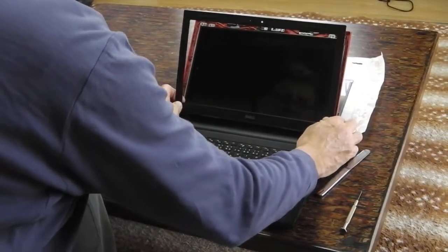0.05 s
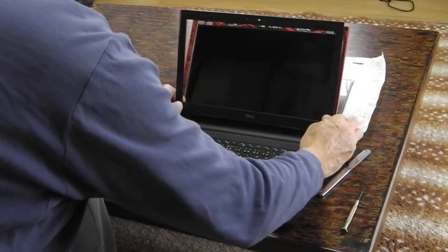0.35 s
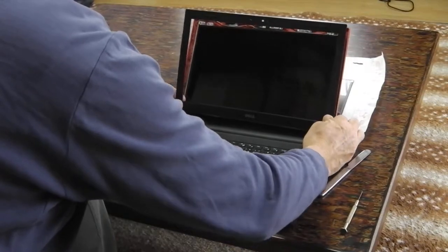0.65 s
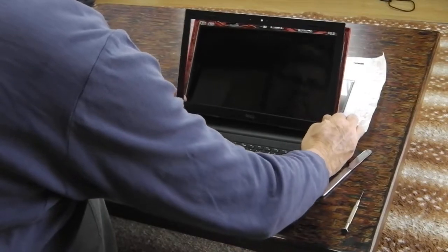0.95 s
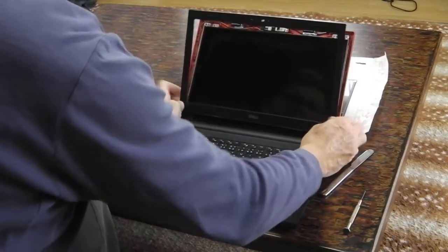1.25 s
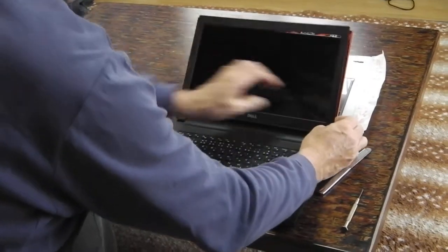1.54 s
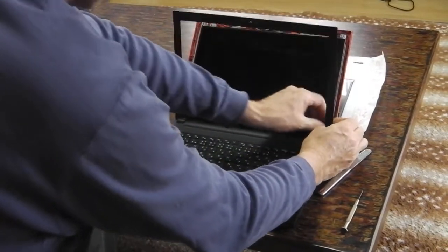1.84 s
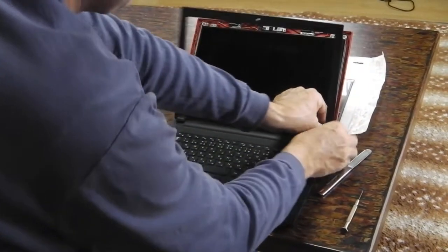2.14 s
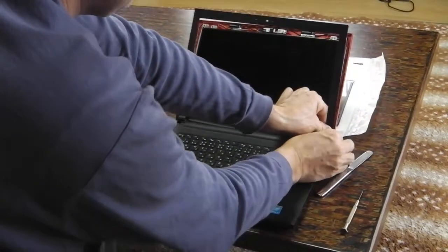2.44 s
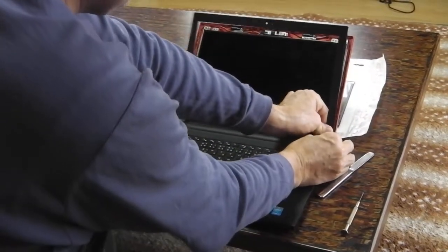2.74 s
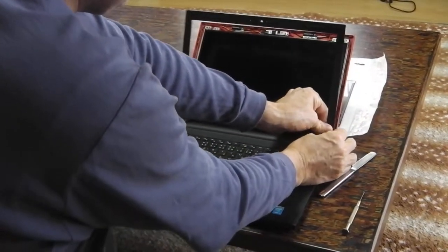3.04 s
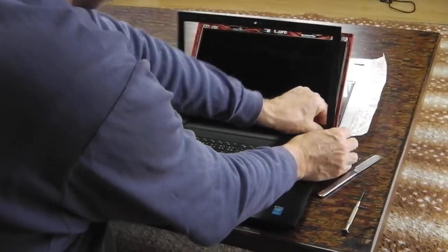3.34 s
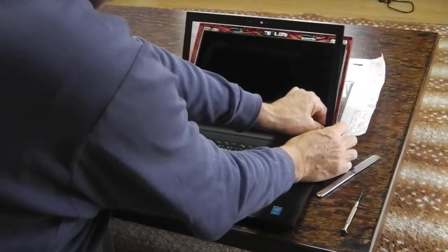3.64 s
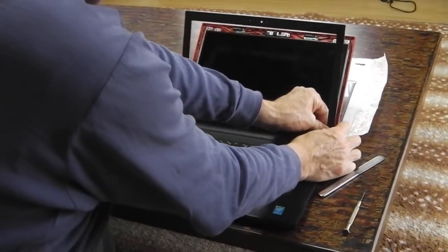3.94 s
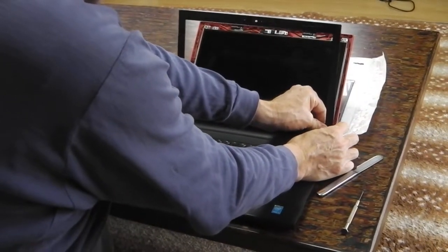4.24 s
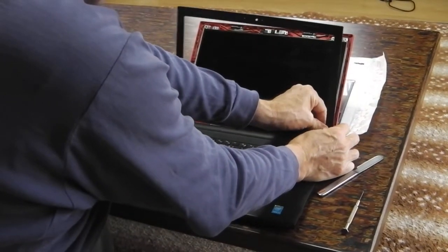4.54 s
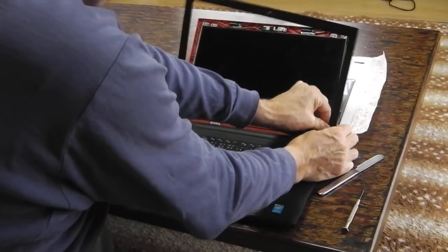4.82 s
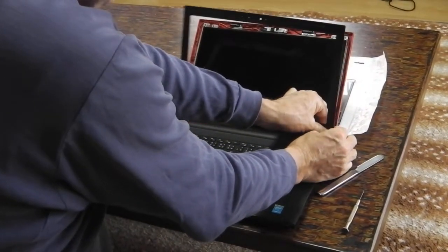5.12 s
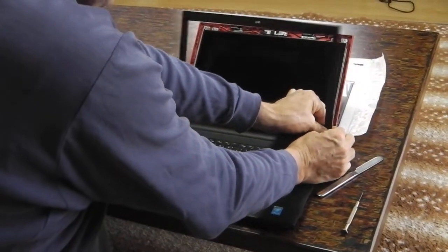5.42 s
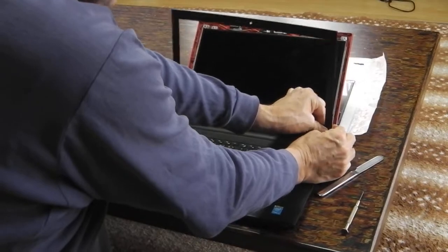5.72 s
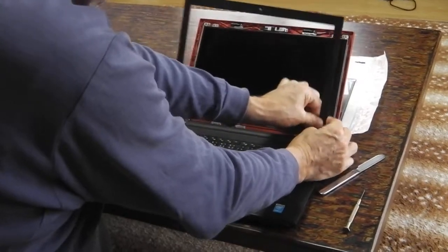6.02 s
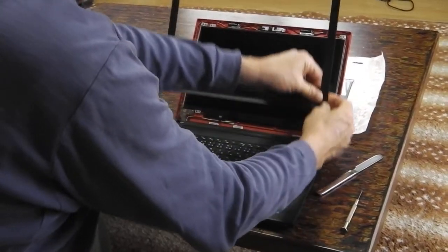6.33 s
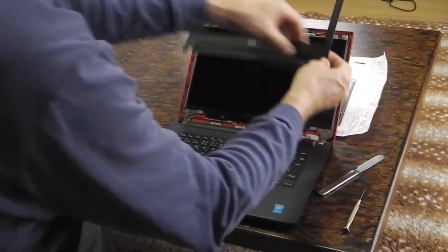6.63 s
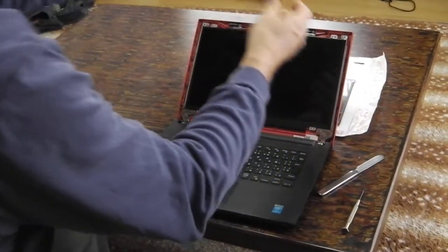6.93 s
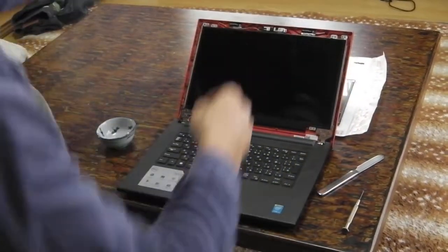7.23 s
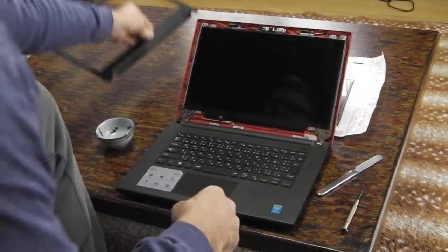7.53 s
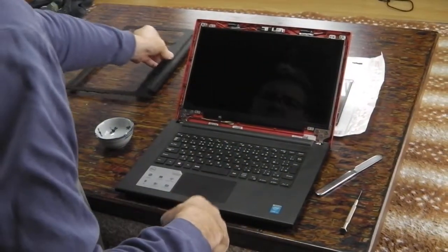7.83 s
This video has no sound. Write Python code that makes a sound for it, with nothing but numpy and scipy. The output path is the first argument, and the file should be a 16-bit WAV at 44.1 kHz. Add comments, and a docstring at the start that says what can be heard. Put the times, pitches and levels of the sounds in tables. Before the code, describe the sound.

Plastic clips pop free at uneven intervals while a laptop bezel is worked loose by hand, with small scrapes and dull bumps from the lid in between. The loudest snap frees the frame, cloth swishes softly, and the light plastic piece lands on a wooden table with a quick clatter. The microphone is fairly close, in a small room with a low, constant hiss.

```python
"""Plastic clips snap free and rebound as a bezel is pried off a laptop lid, on a wooden table in a
small room. Each snap is an impulse that excites the damped modes of the shell; trains of tiny
impulses drive the same modes as scrapes, ticks and blows. Each pull and release rocks the lid with a
low thump, single parts of the case ring out, and the hands rub on it. A sleeve rustles as the frame
is lifted away, and the frame clatters onto the table, over a steady hiss."""
import sys
import numpy as np
from scipy import signal
from scipy.fft import rfft, irfft, next_fast_len
from scipy.io import wavfile
from scipy.ndimage import uniform_filter1d, map_coordinates

SR = 44100
rng = np.random.default_rng(int(sys.argv[2]) if len(sys.argv) > 2 else 0)


def int16_out(signal):
    """Quantize to a 16-bit WAV file."""
    q = np.round(np.clip(np.atleast_2d(signal).T, -1, 1) * 32767)
    wavfile.write(sys.argv[1], SR, q.astype(np.int16))


N = 351477
RING = np.arange(SR // 2) / SR  # time since a blow [s]

# clips letting go and edges striking: (time [s], relative level [dB], body re middle band [dB],
# treble re middle band [dB], resonance of the spot [Hz], rebound re snap [dB], lid boom re snap [dB])
SNAPS = [(1.2592, -42.5, -1.5, 0, 2370, -2.5, 0), (1.4848, -27, -5.5, -0.5, 1970, -6, -5),
         (2.2526, -47.5, 0, -11, 1500, -4, -0.5), (2.5055, -42, -5, -12, 2120, -3, -19),
         (4.1963, -34, -3, 2, 5300, -8.5, 2.5), (4.348, -46, -3, -13, 1590, 4, -4),
         (5.0465, -30.5, -11.5, -6.5, 3730, -1, -20), (5.2175, -41.5, -9, -7, 2760, -11, -13),
         (5.7565, -15.5, -1.5, -2.5, 1200, 0, -1), (6.5444, -59, -17, 22.5, 11100, -3.5, -22),
         (7.684, -31.5, -8.5, 0.5, 6060, 1.5, -25), (7.8964, -25.5, -9, -3.5, 6300, 6.5, -10),
         (7.924, -19.5, -3, 2.5, 1150, -7.5, -4), (7.9357, -22, 2, -1, 1100, -1.5, -23)]
# pulls on the frame that rock the lid: (peak time [s], relative level [dB])
PULLS = [(0.176, -46), (0.492, -47.5), (0.605, -41.5), (0.868, -38.5), (1.082, -37), (1.209, -39.5),
         (1.301, -39), (1.765, -51.5), (2.328, -50), (2.837, -41), (3.271, -44), (4.162, -44.5),
         (4.907, -39.5), (5.278, -41.5), (5.528, -42.5), (6.007, -42.5), (7.804, -41.5)]
# body, middle and treble bands of the shell: (lower edge [Hz], upper edge [Hz])
BANDS = [(200, 1500), (1500, 6000), (6000, 16000)]
# stereo width of the shell's sound: (frequency [Hz], side re mid [dB])
WIDTH = [(200, -16), (1200, -18), (2400, -10), (4400, -6.5), (8000, 1.5), (15000, 0.5)]


def snaps(level_db=0.87, strain_db=-18, strain_s=0.0082, rebound_s=0.0058, rebound_treble_db=6.5):
    """Release of elastic energy: a clip creaks under growing strain, lets go and strikes again."""
    out = np.zeros((2, N))
    for s, db, body, treble, spot_hz, rebound_db, _ in SNAPS:
        t60 = 0.12 * 2 ** ((db + 32) / 90)  # a harder snap rings longer
        strain = dense_modes([body, 0, treble], spot_hz) * np.exp(-RING[::-1] / strain_s)
        add(out, s - len(RING) / SR, amp(db + strain_db) * strain)
        release = (0, db, treble)
        rebound = (rebound_s, db + rebound_db, treble + rebound_treble_db)
        for delay, blow_db, treble_db in [release, rebound]:
            blow = shell_response([body, 0, treble_db], spot_hz, t60, modes_db=-16.5, room_db=-9.5)
            add(out, s + delay, amp(blow_db + level_db) * bending_spread(blow))
    return stereo(*out)


def bending_spread(blow, split_hz=1100, high_rise_s=0.00035, low_rise_s=0.0026):
    """Dispersion: low bending waves cross the panel slowly, so the lows swell after the crack."""
    lows = signal.sosfiltfilt(signal.butter(2, split_hz, fs=SR, output="sos"), blow)
    highs = blow - lows
    return highs * (1 - np.exp(-RING / high_rise_s)) + lows * (1 - np.exp(-RING / low_rise_s))


def shell_response(band_db, spot_hz, t60, modes_db, room_db):
    """Impulse response by modal superposition, mid and side: crack, dense ring, lasting modes, room."""
    # modes of the plastic shell: (frequency [Hz], relative level [dB], t60 [s])
    shell_modes = [(422.5, 2.5, 0.11), (705, -8, 0.33), (1080, 13, 0.033), (1216, -5, 0.31),
                   (1542, 5.5, 0.12), (1910, -6, 0.23), (2220, 10, 0.055), (2797, 5, 0.12),
                   (3690, -1, 0.14), (4280, 0, 0.076), (4600, -17, 0.22), (5260, -1.5, 0.27),
                   (5800, 2, 0.22), (6900, 3, 0.26), (8200, -17, 0.14)]
    crack = 1 + 0.52 * np.exp(-RING / 0.00097)
    out = dense_modes(band_db, spot_hz) * crack * amp(-60 * RING / t60)
    for hz, db, mode_t60 in shell_modes:
        drive_db = np.interp(np.log(hz), np.log(BANDS).mean(1), band_db)
        mode_db = drive_db + modes_db + db + 2 * rng.standard_normal()
        held_hz = hz * (1 + 0.0021 * rng.standard_normal())  # the grip detunes each mode a little
        phase = 2 * np.pi * (held_hz * RING + rng.random((2, 1)))
        mid_side = amp([[0], [along(WIDTH, hz)]])
        out += mid_side * amp(mode_db - 60 * RING / mode_t60) * np.sin(phase)
    return out + amp(room_db) * room_tail(dense_modes(band_db, spot_hz))


def dense_modes(band_db, spot_hz, spot_db=6, spot_octaves=0.24):
    """Modal overlap: close modes merge into noise, mid and side, with a peak for the touched spot."""
    # spectrum of a plastic crack: (frequency [Hz], relative spectral density [dB])
    crack_spectrum = [(150, -4), (310, -19), (440, 2), (580, -7.5), (1200, -6), (2000, -1.5), (4000, 2.5),
                      (6000, -1), (7200, 4.5), (8400, 7), (9400, -9), (11500, 2.5), (13000, -7.5),
                      (16000, -20)]
    hz = np.fft.rfftfreq(len(RING), 1 / SR)
    resonance_db = spot_db * np.exp(-(np.log2((hz + 1) / spot_hz) / spot_octaves) ** 2)
    colour = amp(along(crack_spectrum, hz) + resonance_db)
    shapes = [colour / np.sqrt((1 + (lo / (hz + 1)) ** 8) * (1 + (hz / hi) ** 8)) for lo, hi in BANDS]
    gain = np.sqrt(sum((amp(db) * unit(shape)) ** 2 for db, shape in zip(band_db, shapes)))
    white = rfft(rng.standard_normal((2, len(RING))))
    return irfft(white * [gain, gain * amp(along(WIDTH, hz))], len(RING))


def scrapes_and_ticks(level_db=1, impulses_per_s=2500, scatter_db=5):
    """Stick-slip and impact: uneven impulses drive the shell; long runs scrape, short ones strike."""
    # short scrapes, ticks and sharp blows of plastic on plastic: (peak time [s], half length [s],
    # relative level [dB], treble re middle band [dB], resonance of the spot [Hz])
    contacts = [(0.311, 0.026, -55.5, 2.5, 5000), (0.393, 0.0098, -59, 2.5, 1500),
                (0.848, 0.0072, -57, 4.5, 2750), (1.236, 0.013, -59.5, 7.5, 1200),
                (1.543, 0.0059, -45.5, 1, 2390), (1.79, 0.0077, -55, 1, 2360),
                (2.125, 0.014, -46, -3.5, 2640), (2.609, 0.0059, -56.5, -9, 1580),
                (2.815, 0.015, -57, -12, 980), (3.221, 0.006, -59, 6, 1200),
                (3.252, 0.0076, -56.5, -7, 1150), (3.883, 0.004, -56.5, 2, 5500),
                (4.093, 0.012, -55, 6.5, 1020), (4.36, 0.006, -44, -3, 1590),
                (4.739, 0.014, -56.5, -10, 1200), (4.804, 0.005, -54.5, -13, 3570),
                (4.878, 0.021, -55.5, 2, 1180), (5.135, 0.008, -63.5, 13.5, 1150),
                (5.246, 0.007, -49, 1, 1480), (5.49, 0.019, -53, -7, 1400),
                (5.594, 0.011, -51.5, -1.5, 1410), (5.729, 0.012, -42, -2.5, 1170),
                (5.765, 0.003, -16, -10, 4400), (5.972, 0.004, -49.5, 8, 6300),
                (5.989, 0.0053, -41.5, -7.5, 3016), (6.504, 0.0072, -61.5, 11, 9400),
                (6.536, 0.0042, -47.5, -6, 1860), (6.743, 0.019, -56, 4, 6660),
                (7.709, 0.0083, -35, -13, 5100), (7.76, 0.0077, -42, 3.5, 5270),
                (7.855, 0.022, -57, 3, 2600), (7.893, 0.0049, -40.5, -5, 3220),
                (7.945, 0.005, -29, -8, 880), (7.949, 0.0095, -23, -5, 3350)]
    out = np.zeros((2, N))
    for s, half, db, treble, spot_hz in contacts + creaks() + finger_slips():
        body = 2 - 4.5 * np.log2(spot_hz / 1100)  # a higher spot has less body
        band_db = [body, 0, treble]
        t = np.arange(-2 * half, 2 * half, 1 / SR)
        impulses = rng.random(len(t)) < impulses_per_s / SR
        impulses[len(t) // 2] = True
        sizes = rng.choice([-1, 1], len(t)) * amp(scatter_db * rng.standard_normal(len(t)))
        force = impulses * sizes * np.exp(-(t / half) ** 2)
        ring = shell_response(band_db, spot_hz, t60=0.098, modes_db=-24, room_db=-4.5)
        contact = signal.fftconvolve(force[None], ring, axes=1)
        peak_rms = np.sqrt(uniform_filter1d(contact[0] ** 2, int(2 * half * SR)).max())
        gain = amp(db + level_db) * np.linalg.norm(amp(band_db)) / peak_rms
        add(out, s - 2 * half - 0.003, gain * contact)
    return stereo(*out)


def creaks(lead_s=0.013, half_s=0.011, re_pull_db=-25, treble_db=-16, spot_hz=1060):
    """Friction under load: rows for the dull scrape that leads each pull."""
    return [(s - lead_s, half_s, db + re_pull_db, treble_db, spot_hz) for s, db in PULLS]


def finger_slips(count=14, span_s=(0.13, 8.1), half_s=0.01, level_db=-62.5, range_db=6, treble_db=-3):
    """Light friction: rows for faint scrapes at random times as the fingers work along the seam."""
    when, size, spot = rng.random((count, 3)).T
    times = np.interp((np.arange(count) + when) / count, [0, 1], span_s)
    levels = level_db + range_db * (size - 0.5)
    spots_hz = np.interp(spot, [0, 1], (900, 2810))
    return [(s, half_s, db, treble_db, hz) for s, db, hz in zip(times, levels, spots_hz)]


def lid_booms(level_db=-1, rise_s=0.0096, lag_s=0.028, boom_hz=141.8, sway_hz=62, knock_hz=438,
              rattle_hz=155, rattle_width_hz=26, grip_detune=0.037):
    """Damped oscillation: pulls and snaps rock the lid on its hinges, and the loose panel rattles."""
    out = np.zeros(N)
    held = [(s, db, grip_detune * rng.standard_normal()) for s, db in PULLS]
    freed = [(s + lag_s, db + boom_db, 0) for s, db, *_, boom_db in SNAPS]
    for s, db, detune in held + freed:
        # the harder the lid is rocked, the lower, longer and cleaner it booms
        excess_db = db + 41.5
        hz = (boom_hz - 0.2 * excess_db) * (1 + detune)
        t60 = 0.19 * 2 ** (excess_db / 42)
        rattle_db = -6 - 0.31 * excess_db
        sway = amp(-19) * damped_mode(sway_hz * (1 + 0.12 * rng.standard_normal()), t60, rise_s)
        knock = amp(-21) * damped_mode(knock_hz, t60, rise_s)
        rattle = noise(lambda f: np.exp(-((f - rattle_hz) / rattle_width_hz) ** 2 / 2), len(RING))
        rattle *= amp(rattle_db) * swell(t60, rise_s)
        boom = damped_mode(hz, t60, rise_s) + sway + knock + rattle
        add(out, s - 3 * rise_s, amp(db + level_db) * boom)
    return out * amp([[1.3], [-1.5]])


def case_pings(level_db=-1, rise_s=0.003, relative_width=0.071):
    """Resonance: a knock or rub rings one part of the case, a tone roughened by narrow-band noise."""
    # parts ringing above the rest: (peak time [s], relative level [dB], frequency [Hz])
    resonances = [(0.808, -54, 432), (3.173, -48.5, 728), (4.719, -52, 482), (4.361, -40, 1540),
                  (5.056, -41.5, 1130), (5.22, -45, 2840), (6.538, -49, 1796), (6.553, -51.5, 955),
                  (7.411, -52, 403), (7.936, -30, 1123)]
    out = np.zeros(N)
    for s, db, hz in resonances:
        t60 = 0.11 * (700 / hz) ** 0.5  # higher parts die sooner
        rub = noise(lambda f: np.exp(-((f / hz - 1) / relative_width) ** 2 / 2), len(RING))
        ping = damped_mode(hz, t60, rise_s) + rub * swell(t60, rise_s)
        add(out, s - 3 * rise_s, amp(db + level_db) * ping)
    return out


def sleeve(flutter_db=1.0, flutter_per_s=40):
    """Friction noise: cloth brushes past with a fine, uneven hiss while the arm moves."""
    # course of the rustle: (time [s], level [dB])
    rustle_levels = [(6.5, -54.5), (7.0, -65), (7.14, -60), (7.23, -50), (7.39, -50.5), (7.5, -60),
                     (7.6, -82)]
    # spectrum of the cloth: (frequency [Hz], relative spectral density [dB])
    cloth_spectrum = [(300, -22), (1200, -6), (3000, 0), (8000, 1), (9500, -4), (12000, -1), (16000, -31)]
    t = np.arange(N) / SR
    flutter = map_coordinates(rng.standard_normal(N // 100), [t * flutter_per_s])
    cloth = np.array([noise(lambda hz: amp(along(cloth_spectrum, hz)), N) for _ in range(2)])
    level_db = np.interp(t, *np.transpose(rustle_levels), left=-np.inf, right=-np.inf)
    return cloth * amp(level_db + flutter_db * flutter)


def grip(centre_hz=51, width_octaves=1, flutter_db=3, flutter_per_s=12):
    """Low-frequency friction noise: palm and forearm rub on the case with a faint, lumpy rumble."""
    # rubbing as the hands shift their grip: (time [s], relative level [dB])
    rub_levels = [(0, -57.5), (0.7, -68), (0.95, -59), (1.3, -60.5), (1.9, -68), (2.35, -61), (2.7, -72.5),
                  (4.2, -68), (6.0, -67)]
    t = np.arange(N) / SR
    flutter = map_coordinates(rng.standard_normal(N // 100), [t * flutter_per_s])
    rumble = noise(lambda hz: np.exp(-(np.log2((hz + 1) / centre_hz) / width_octaves) ** 2), N)
    level_db = np.interp(t, *np.transpose(rub_levels), right=-np.inf)
    return rumble * amp(level_db + flutter_db * flutter) * amp([[1.5], [-1.5]])


def room_tail(excitation, build_s=0.016):
    """Reverberation: the diffuse field builds up, then decays at its own rate at each frequency."""
    # reverberation time of the room: (frequency [Hz], t60 [s])
    room_t60 = [(200, 0.39), (1000, 0.25), (4000, 0.23), (12000, 0.27)]
    hz, t, spectrum = signal.stft(excitation, SR, nperseg=256)
    decay = amp(-60 * t / along(room_t60, hz)[:, None])
    _, tail = signal.istft(spectrum * decay, SR, nperseg=256)
    return tail[:, :len(RING)] * (1 - np.exp(-RING / build_s))


def hiss(level_db=-52.5, mid_db=-0.5, side_db=2.5):
    """Stationary noise: room tone and microphone hiss, wide because mid and side are uncorrelated."""
    # noise floor, mid and side: (frequency [Hz], relative spectral density [dB])
    mid_spectrum = [(15, -35), (25, -12), (48, -9.5), (107, -5), (137, -1.5), (248, -18.5), (333, -8),
                    (437, -6), (905, -14.5), (1060, -12), (1280, -15.5), (1550, -14.5), (1820, -15),
                    (3490, -15.5), (15800, -18)]
    side_spectrum = [(15, -64), (25, -44), (80, -7), (170, -13), (276, -16.5), (414, -5), (857, -15.5),
                     (955, -13.5), (1680, -15.5), (3880, -17), (7630, -18), (11700, -19.5), (15800, -23.5)]
    mid = amp(mid_db) * noise(lambda hz: amp(along(mid_spectrum, hz)), N)
    side = amp(side_db) * noise(lambda hz: amp(along(side_spectrum, hz)), N)
    return amp(level_db) * stereo(mid, side)


def damped_mode(hz, t60, rise_s):
    """A sinusoid of random phase that swells to rms 1 and decays."""
    return np.sqrt(2) * swell(t60, rise_s) * np.sin(2 * np.pi * (hz * RING + rng.random()))


def swell(t60, rise_s):
    """Gaussian onset that reaches 1 after three rise times, then exponential decay."""
    t = RING - 3 * rise_s
    return np.where(t < 0, np.exp(-(t / rise_s) ** 2), amp(-60 * t / t60))


def noise(gain, size):
    """White noise filtered by gain(Hz), at rms 1."""
    m = next_fast_len(size)
    spectrum = rfft(rng.standard_normal(m)) * gain(np.fft.rfftfreq(m, 1 / SR))
    return unit(irfft(spectrum, m)[:size])


def amp(db):
    """Decibels to amplitude ratio."""
    return 10 ** (np.asarray(db) / 20)


def unit(x):
    """Normalisation to rms 1."""
    return x / np.sqrt(np.mean(x ** 2) + 1e-20)


def along(points, hz):
    """Interpolation of (frequency [Hz], value) points on a logarithmic frequency axis."""
    f, v = np.transpose(points)
    return np.interp(np.log(hz + 1), np.log(f + 1), v)


def stereo(mid, side):
    """Left and right as the sum and difference of mid and side."""
    return np.array([mid + side, mid - side])


def add(track, s, x):
    """Superpose x on the track from time s on."""
    start = max(round(s * SR), 0)
    part = track[..., start:start + x.shape[-1]]
    part += x[..., :part.shape[-1]]


def scene():
    """Linear superposition of all that the hands set off, over the quiet room."""
    return snaps() + scrapes_and_ticks() + lid_booms() + case_pings() + grip() + sleeve() + hiss()


def record(dry, notch_hz=7850, notch_width_hz=480, top_hz=15900):
    """Filtering and saturation: a narrow treble notch, peaks rounded near full scale, a band limit."""
    notched = signal.lfilter(*signal.iirnotch(notch_hz, notch_hz / notch_width_hz, SR), dry)
    rounded = notched / (1 + notched ** 6) ** (1 / 6)
    m = next_fast_len(N + SR // 2)
    passband = np.fft.rfftfreq(m, 1 / SR) < top_hz
    return irfft(rfft(rounded, m) * passband, m)[:, :N]


dry = scene()
out = record(dry)
int16_out(out)
```